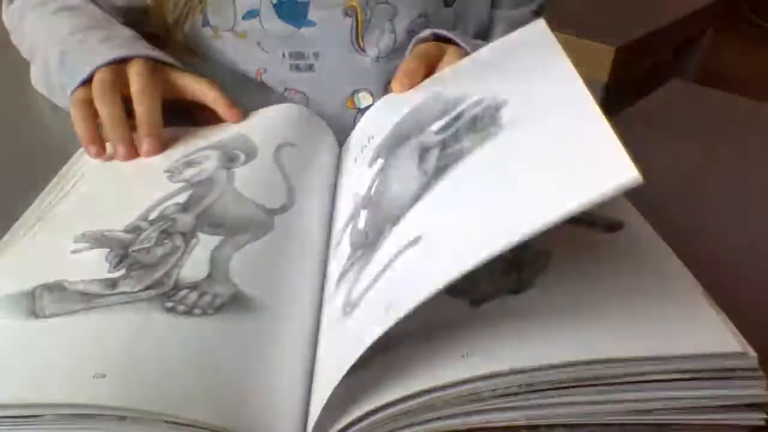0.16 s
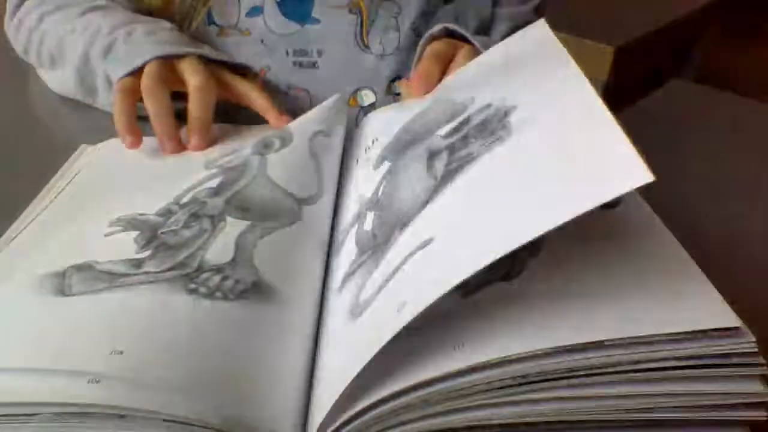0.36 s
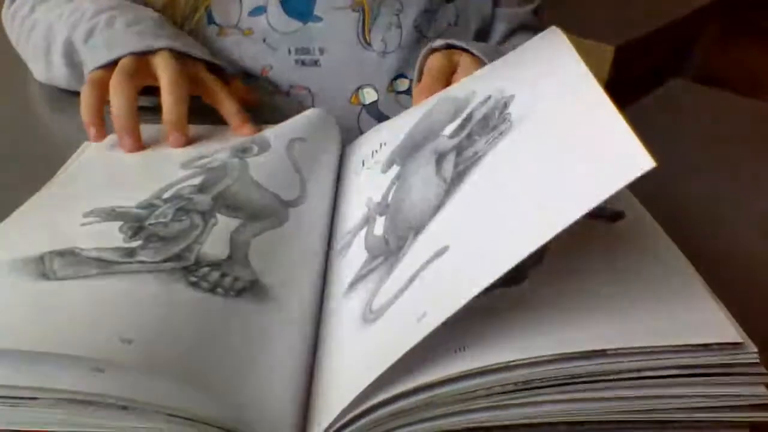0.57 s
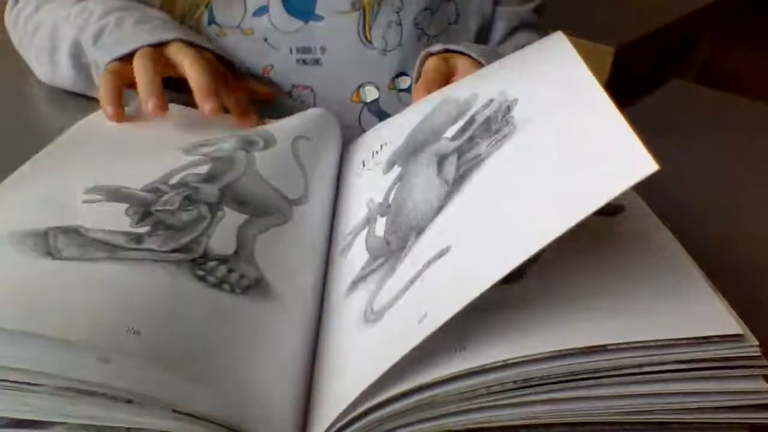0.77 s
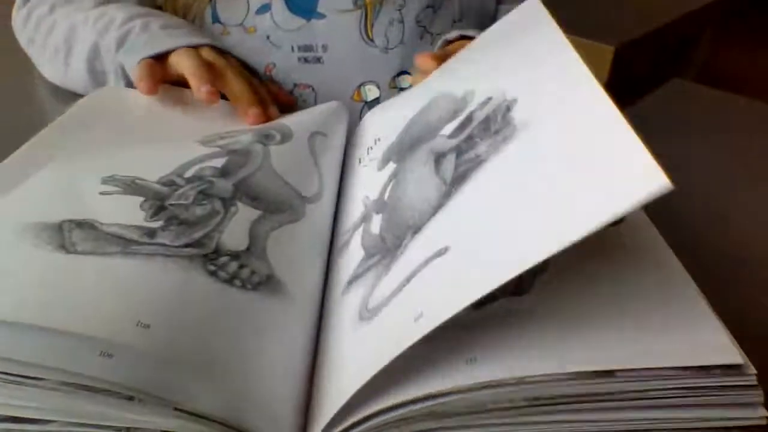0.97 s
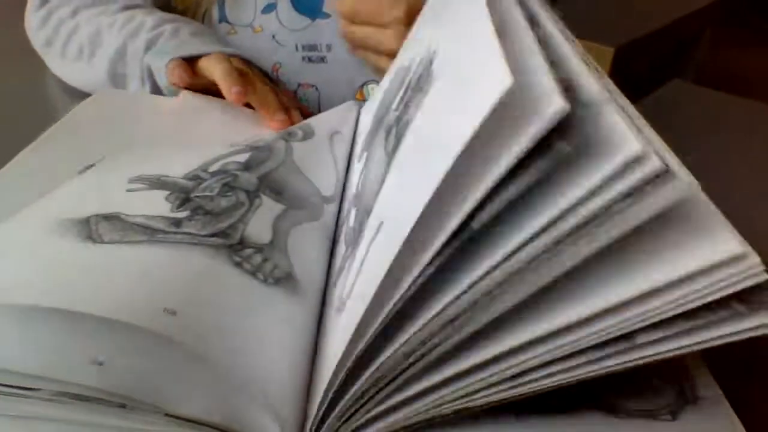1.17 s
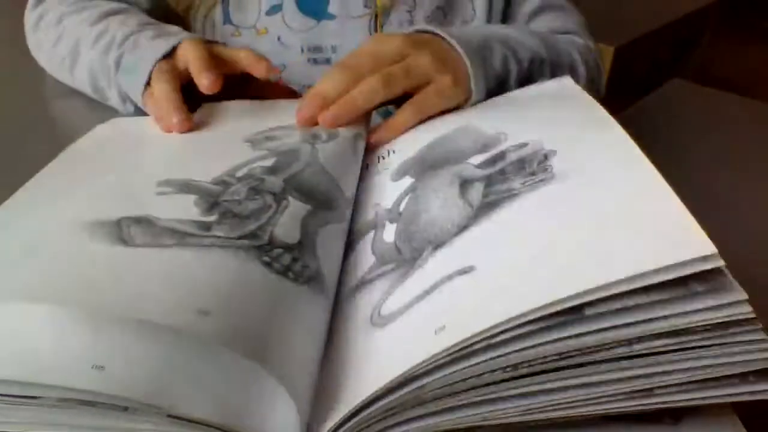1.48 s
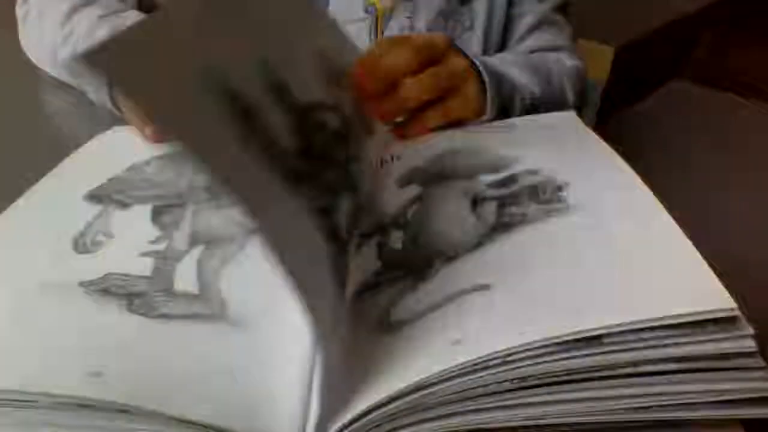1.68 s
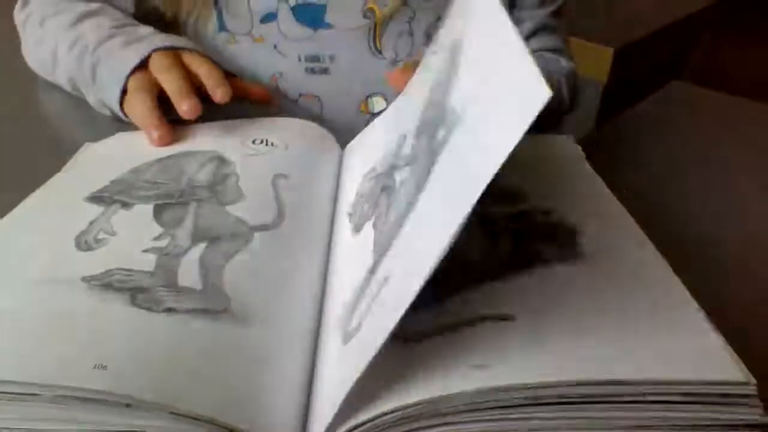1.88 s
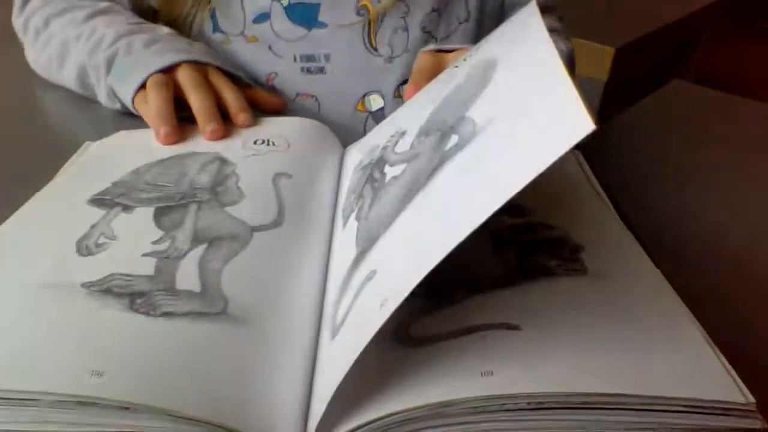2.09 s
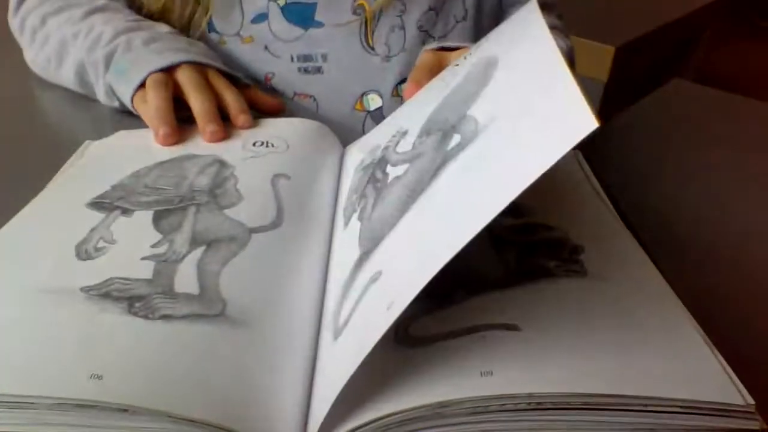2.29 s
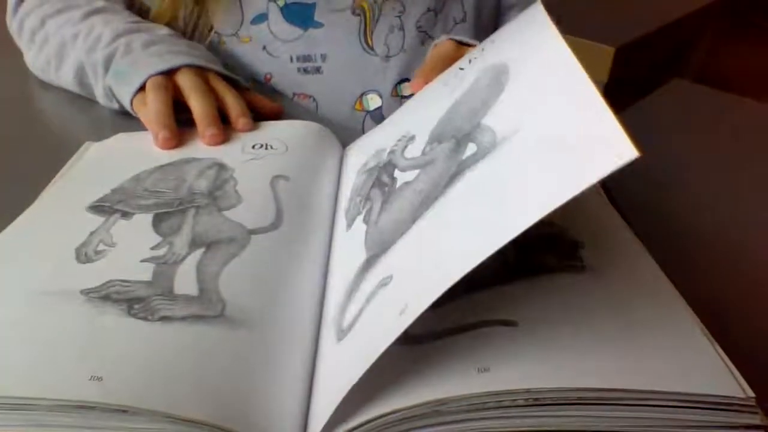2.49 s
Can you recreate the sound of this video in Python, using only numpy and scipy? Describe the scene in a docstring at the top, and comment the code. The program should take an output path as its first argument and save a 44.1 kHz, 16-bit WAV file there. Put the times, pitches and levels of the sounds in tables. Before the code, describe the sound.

Close, dry page turning indoors: stiff sheets swish and rub under fingers, buckle with bright snaps, tick at the edges and land with short thumps, over low room rumble and faint hiss, calming towards the end.

```python
"""Picture book pages turned by hand

Thick pages are turned close to a small microphone in a quiet room: fingers and pages slide (coloured
grain noise), stiff sheets flex (resonant creases) and buckle with snaps (damped sines, noise cracks),
page edges tick and creases pop (wavelets), and the block of pages thuds (damped modes).
A near surface echoes and the room rings briefly over rumble, faint hiss and two thin tones."""
import sys
import numpy as np
from scipy import signal
from scipy.fft import rfft, irfft, next_fast_len
from scipy.io import wavfile
from scipy.ndimage import uniform_filter1d, map_coordinates

SR = 44100
rng = np.random.default_rng(int(sys.argv[2]) if len(sys.argv) > 2 else 0)


def pcm_store(signal):
    """Save signal as 16-bit PCM."""
    levels = np.round(np.clip(np.atleast_2d(signal), -1, 1) * 32767)
    wavfile.write(sys.argv[1], SR, levels.astype(np.int16).T)


def amplitude_ratio(level_db):
    """Convert a level in decibels to the matching linear amplitude (field) ratio."""
    exponent = np.asarray(level_db, float) / 20
    return 10 ** exponent


N = 116865
HIT_T_S = np.arange(SR // 5) / SR  # time axis of one hit
EARLY_S = (SR // 200) / SR  # margin ahead of a burst or wavelet
MODE_SCATTER_DB = 2  # mode levels vary from hit to hit


def unit(x):
    """Scale to rms 1."""
    return x / np.sqrt(np.mean(x ** 2) + 1e-20)


def along(points, hz):
    """Interpolate (Hz, value) points on a log frequency axis."""
    f, v = np.transpose(points)
    return np.interp(np.log(hz + 1), np.log(f + 1), v)


def wobble(knots_per_s):
    """A smooth random curve."""
    return map_coordinates(rng.standard_normal(N // 50), [np.arange(N) * knots_per_s / SR])


def coloured(x, spectrum):
    """Filter x by a (Hz, dB) gain curve, zero phase."""
    m = next_fast_len(len(x) + 8192)
    gain = amplitude_ratio(along(spectrum, np.fft.rfftfreq(m, 1 / SR)))
    return irfft(rfft(x, m) * gain, m)[:len(x)]


def grains(per_s, spread_db):
    """Tiny slips at random times, of uneven size; rms 1."""
    hit = rng.random(N) < per_s / SR
    size = amplitude_ratio(spread_db * rng.exponential(size=N))
    return unit(hit * rng.standard_normal(N) * size)


def patchy(x, depth_db):
    """Random bands of gain that drift over time."""
    z = signal.stft(x, nperseg=256)[2]
    field = uniform_filter1d(rng.standard_normal(z.shape), size=3, axis=0)
    field = uniform_filter1d(field, size=25, axis=1)
    return signal.istft(z * amplitude_ratio(depth_db * unit(field)), nperseg=256)[1][:N]


def ring(hz, t60_s, t, phase=None):
    """A damped sine; its phase in turns is random unless given."""
    if phase is None:
        phase = rng.random()
    return amplitude_ratio(-60 * t / t60_s) * np.sin(2 * np.pi * (hz * t + phase))


def add(out, s, x):
    """Mix x into out from time s."""
    out[round(s * SR):][:len(x)] += x


def swell(start, crest, end):
    """A stroke's gain: up to the crest, down to the end; a crest past the end cuts it off."""
    u = np.interp(np.arange(N) / SR, [start, crest, end], [-1, 0, 1])
    return np.abs(np.cos(np.pi / 2 * u)) ** 2.27


def burst(shape, colour):
    """Noise under an envelope, delayed by EARLY_S, then coloured; peak 1."""
    noise = rng.standard_normal(len(shape)) * shape
    x = coloured(np.roll(noise, SR // 200), colour)
    return x / np.abs(x).max()


def wavelet(hz, half_cycles):
    """A cosine of random phase under a Gaussian swell centred at EARLY_S."""
    turns = (HIT_T_S - EARLY_S) * hz
    return np.exp(-(turns / half_cycles) ** 2) * np.cos(2 * np.pi * (turns + rng.random()))


def floor():
    """Room rumble and microphone hiss as coloured noise, and two thin, slightly wavering tones."""
    # noise colour: (frequency [Hz], gain [dB])
    hiss_colour = [(18, -42.5), (30, -7), (122, -17), (196, -11), (323, -22.5), (480, -16.5), (676, -15.5),
                   (3760, -40.5), (14100, -27.5), (16500, -57.5)]
    # thin tones: (frequency [Hz], mean level [dB rms])
    whine = [(8050, -93.5), (11600, -83)]
    hiss_db_rms = -69
    t = np.arange(N) / SR
    out = amplitude_ratio(hiss_db_rms) * unit(coloured(rng.standard_normal(N), hiss_colour))
    for hz, db in whine:
        out += amplitude_ratio(db + 1.3 * wobble(24)) * np.sqrt(2) * np.sin(2 * np.pi * hz * t)
    return out


def room(x):
    """One early echo and a tail dying by band, drawn anew every 0.1 s as the book moves."""
    # reverberation: (frequency [Hz], t60 [s])
    decay = [(150, 0.33), (800, 0.21), (2000, 0.17), (5000, 0.2), (13000, 0.067)]
    # what the room returns: (frequency [Hz], gain [dB])
    walls = [(100, 3.5), (1500, 2), (5000, -9.5), (15000, -23)]
    echo_s, echo_db, tail_delay_s, tail_db = 0.011, -14.5, 0.003, -11
    out, step = np.zeros(N + SR), SR // 10
    x = coloured(x, walls)
    add(out, echo_s, amplitude_ratio(echo_db) * x)
    for start in range(0, N, step):
        hz, t, z = signal.stft(rng.standard_normal(SR // 3), SR, nperseg=256)
        fade = amplitude_ratio(-60 * t / along(decay, hz)[:, None])
        tail = signal.istft(z * fade, SR, nperseg=256)[1]
        tail /= np.linalg.norm(tail)
        wet = signal.fftconvolve(x[start:start + step], tail)
        add(out, start / SR + tail_delay_s, amplitude_ratio(tail_db) * wet)
    return out[:N]


def thuds():
    """The block of pages lands: a short damped tone plus the modes of the book on the table."""
    # landings: (time [s], level [dB], pitch [Hz], table shake [dB])
    landings = [(0.2049, -14, 508, -3.5), (.217, -20, 450, 3), (0.67, -21.5, 700, -1),
                (0.794, -17.5, 552, 2.5), (0.957, -27.5, 154, 8.5), (1.467, -27.5, 590, 4),
                (2.063, -15, 602, -23), (2.094, -13, 557, -22)]
    # modes of the book on the table: (frequency [Hz], level [dB], t60 [s])
    book_modes = [(102, -15, 0.06), (160, -17.5, 0.044), (214.4, -10.5, 0.046)]
    rise_s, t60_cycles = 0.0011, 8.9
    out, t = np.zeros(N + SR), HIT_T_S
    rise = 1 - np.exp(-t / rise_s)
    for s, db, hz, shake_db in landings:
        tone = ring(hz, t60_cycles / hz, t)
        for f, mode_db, t60_s in book_modes:
            tone += amplitude_ratio(shake_db + mode_db + rng.normal(0, MODE_SCATTER_DB)) * ring(f, t60_s, t)
        add(out, s, amplitude_ratio(db - 3) * rise * tone)
    return out[:N]


def ticks():
    """A page edge slips off a finger: a very short wavelet."""
    # slips: (time [s], peak [dB], pitch [Hz])
    slips = [(.1715, -13, 12500), (1.2125, -4, 13000), (1.4633, -7, 13000), (1.467, -8, 10500),
             (1.4825, -17, 3200), (1.6986, -19, 3800), (2.106, -28, 7000), (2.111, -22, 11000),
             (2.1145, -17, 10000), (2.1192, -21, 4500), (2.226, -44, 6000), (2.461, -48, 3000)]
    out = np.zeros(N + SR)
    for s, db, hz in slips:
        add(out, s - EARLY_S, amplitude_ratio(db) * wavelet(hz, half_cycles=0.8))
    return out[:N]


def pops():
    """A crease pops in the bent sheet: a wavelet of a few cycles."""
    # creases: (time [s], peak [dB], pitch [Hz])
    creases = [(.185, -40, 850), (1.469, -24, 1900), (1.4883, -26, 5800), (1.592, -38, 1200),
               (1.605, -36, 1350), (1.622, -36, 1700), (1.635, -33, 1230), (1.642, -35, 1300),
               (1.6605, -29, 2000), (1.7205, -23, 1750), (1.7232, -25, 3300)]
    out = np.zeros(N + SR)
    for s, db, hz in creases:
        add(out, s - EARLY_S, amplitude_ratio(db) * wavelet(hz, half_cycles=2.5))
    return out[:N]


def snaps():
    """A sheet buckles: a faint creak leads into a ring of a few cycles, page modes and a noise crack."""
    # buckles: (time [s], level [dB], ring [Hz], treble [dB], body [dB])
    buckles = [(0.2024, -26.5, 2540, -6, -1), (0.6693, -11.5, 2610, -7, -15),
               (0.695, -29.5, 2170, -30, 4.5), (0.7908, -5, 2980, -12, -17), (0.9067, -4, 2770, -12, -16),
               (0.9423, -7.5, 2690, -12, -18), (0.958, -9.5, 2610, -10, -17), (1.4618, -25.5, 1850, 5, -10),
               (1.4763, -22.5, 2600, -19, -8.5), (1.6988, -26.5, 1830, -2, -22),
               (1.9656, -24.5, 2210, -13, -8.5), (2.0625, -20.5, 2770, -15.5, -14.5),
               (2.0929, -13, 2740, -16.5, -8), (2.1482, -18.5, 2590, -17.5, -2),
               (2.3939, -21, 2523, -20.5, -1)]
    # modes of the pages: (frequency [Hz], level [dB], t60 [s])
    page_modes = [(606, -10.5, 0.011), (825, -5.5, 0.01), (1214, -12.5, 0.015), (1679, -8, 0.0096)]
    # crack colour: (frequency [Hz], gain [dB])
    crack_colour = [(1000, -27.5), (4000, 4.5), (12000, 8), (17000, -11.5)]
    rise_s, t60_cycles, crack_t60_s = 0.0008, 12.57, 0.01
    lead_s, lead_db = 0.003, -19.5
    out, t = np.zeros(N + SR), HIT_T_S
    rise = 1 - np.exp(-t / rise_s)
    crack_shape = rise ** 2 * amplitude_ratio(-60 * t / crack_t60_s)
    creak_shape = (t < 3 * lead_s) * np.exp(np.minimum(t / lead_s, 3))  # grows, then stops at the snap
    for s, db, hz, treble_db, body_db in buckles:
        body = np.zeros(len(t))
        for f, mode_db, t60_s in page_modes:
            gain = amplitude_ratio(body_db + mode_db + rng.normal(0, MODE_SCATTER_DB))
            body += gain * ring(f, t60_s, t, phase=0)
        tone = ring(hz, t60_cycles / hz, t) + 0.51 * ring(hz * 1.249, t60_cycles / hz, t)
        add(out, s, amplitude_ratio(db + 13) * (rise ** 2 * tone + rise * body))
        crack = burst(crack_shape, crack_colour)
        add(out, s - EARLY_S, amplitude_ratio(db + treble_db + 2) * crack)
        creak = burst(creak_shape, [(hz / 3, -25), (hz, 0), (hz * 3, -15)])
        add(out, s - EARLY_S - 3 * lead_s, amplitude_ratio(db + lead_db) * creak)
    return out[:N]


def flex():
    """Small creases sound through the resonance of the bending, rustling sheet."""
    # bends: (start [s], crest [s], end [s], level [dB], pitch [Hz])
    bends = [(0.03, 0.041, 0.14, -51.5, 750), (0.125, 0.14, 0.21, -57.5, 183),
             (0.298, 0.394, 0.42, -37.5, 1460), (0.767, 0.806, 0.83, -35.5, 1460),
             (0.878, 0.905, 1.12, -43.5, 1630), (1.585, 1.645, 1.71, -48, 1370),
             (1.69, 1.708, 1.706, -35, 1450), (1.676, 1.715, 1.833, -54, 434),
             (1.95, 1.956, 2.09, -51, 1870), (1.964, 1.974, 1.97, -37.5, 1010),
             (1.968, 1.991, 2.004, -45.5, 510)]
    edge = 1.46  # frequency ratio to the -6 dB points of the resonance
    out = np.zeros(N)
    for *when, db, hz in bends:
        sheet = [(hz / edge ** 4, -45), (hz / edge, -6), (hz, 0), (hz * edge, -6), (hz * edge ** 4, -40)]
        creases = grains(per_s=3000, spread_db=2)
        out += amplitude_ratio(db) * swell(*when) * unit(coloured(creases, sheet))
    return out


def fibres():
    """Paper fibres catch and slip: dense grains, unsteady in level and patchy in colour."""
    unsteady = amplitude_ratio(0.39 * wobble(60.1) + 1.6 * wobble(250))
    return patchy(grains(per_s=26000, spread_db=1.3) * unsteady, depth_db=3.5)


def slide():
    """Skin and paper slide; each stroke shares its power between a bright and a duller colour."""
    # strokes: (start [s], crest [s], end [s], level [dB], dullness [0-1])
    strokes = [(-.04, 0.063, 0.093, -45, 0.05), (0.044, 0.13, .17, -44.5, 0.09),
               (0.134, 0.197, 0.19, -40, 0), (0.178, 0.325, 0.48, -26, 0.35), (.39, 0.428, 0.53, -39, 0.08),
               (0.491, 0.558, 0.57, -25.5, 0.42), (0.524, 0.592, 0.71, -27, 0.12),
               (0.707, 0.704, 0.9, -45.5, 0.55), (0.859, 0.946, 0.96, -38, 0.8),
               (0.94, 0.964, 1.2, -33.5, 0.44), (0.957, 1.096, 1.413, -33.5, 0.57),
               (1.2, 1.345, 1.395, -37, .8), (1.41, 1.447, 1.46, -48, .9), (1.455, 1.483, 1.54, -34, .4),
               (1.512, 1.598, 1.672, -44.5, 0.3), (1.635, 1.68, 1.82, -37, .1),
               (1.718, 1.72, 1.729, -30.5, 0.02), (1.68, 1.812, 1.905, -38.5, 0),
               (2.101, 2.112, 2.125, -36, 0), (1.85, 1.89, 2.3, -60, 0), (1.919, 1.959, 2.035, -45.5, 0),
               (2.021, 2.1, 2.07, -47.5, 0.7), (2.133, 2.145, 2.33, -63.5, 0.07),
               (2.385, 2.43, 2.65, -69.5, 0.2), (2.62, 2.657, 3.06, -53.5, 0.12)]
    # bright rubbing: (frequency [Hz], gain [dB])
    bright_colour = [(500, -28.5), (1730, -3), (2390, -1.5), (3160, -1.5), (8300, -3), (12000, 3.5),
                     (15600, -4), (16500, -48.5)]
    # duller rubbing: (frequency [Hz], gain [dB])
    dull_colour = [(290, -50), (500, -22.5), (721, -45.5), (1040, 3.5), (1430, -0.5), (2320, -2),
                   (4050, -8), (5510, 7.5), (8060, -4.5), (10500, -0.5), (15300, 1), (16500, -44)]
    bright_power, dull_power = np.zeros(N), np.zeros(N)
    for *when, db, dullness in strokes:
        power = (amplitude_ratio(db) * swell(*when)) ** 2
        bright_power += power * (1 - dullness)
        dull_power += power * dullness
    bright = np.sqrt(bright_power) * unit(coloured(fibres(), bright_colour))
    dull = np.sqrt(dull_power) * unit(coloured(fibres(), dull_colour))
    return bright + dull


def scene():
    """Paper sounds, their room and the noise floor."""
    low_cut_hz = 118  # the small book radiates little lower
    low_cut = signal.butter(2, low_cut_hz, "high", fs=SR, output="sos")
    hits = thuds() + ticks() + pops() + snaps()
    paper = slide() + flex() + signal.sosfilt(low_cut, hits)
    return (paper + room(paper) + floor())[None]


def band_limit(x):
    """A steep low-pass at the top of the band."""
    return signal.sosfilt(signal.butter(12, 16970, fs=SR, output="sos"), x)


def record(dry):
    """The finished mix as recorded."""
    return band_limit(dry)


dry = scene()
out = record(dry)
pcm_store(out)
```